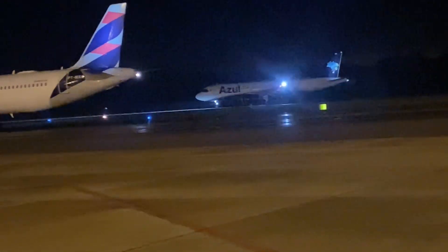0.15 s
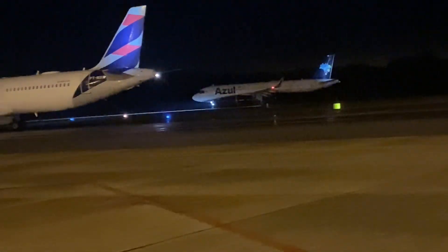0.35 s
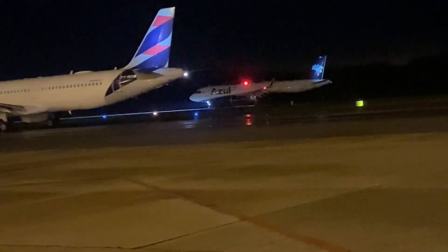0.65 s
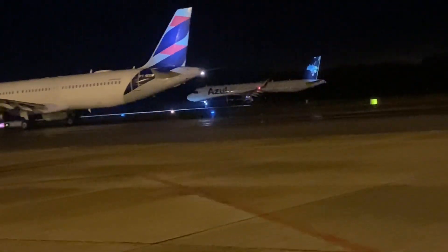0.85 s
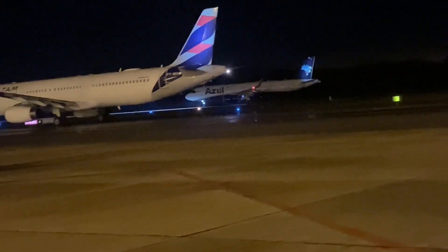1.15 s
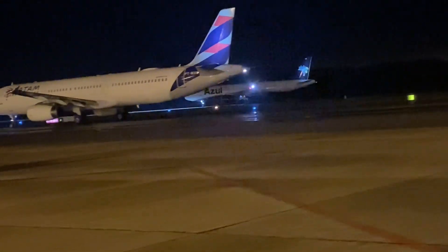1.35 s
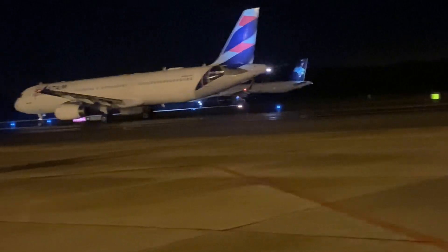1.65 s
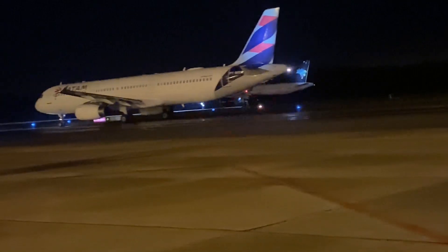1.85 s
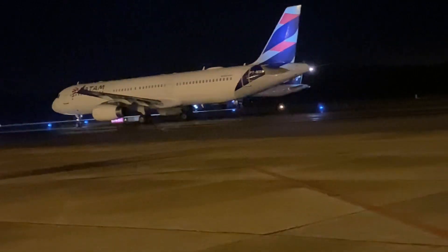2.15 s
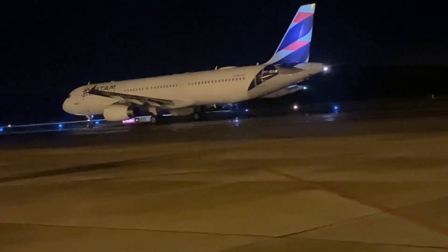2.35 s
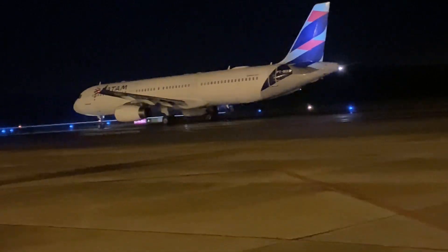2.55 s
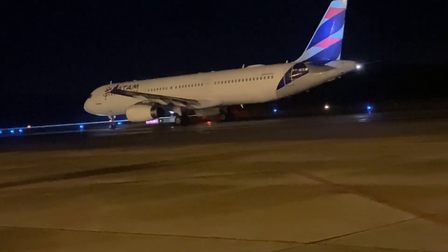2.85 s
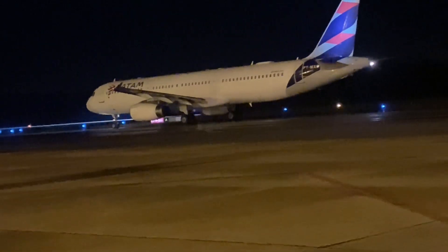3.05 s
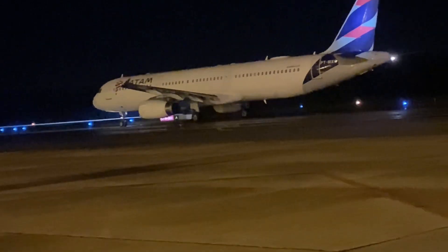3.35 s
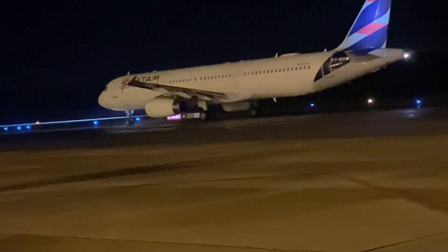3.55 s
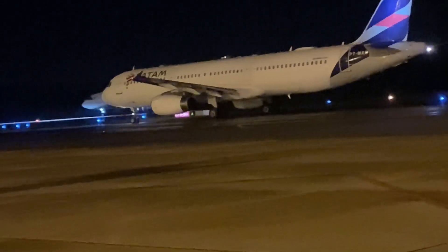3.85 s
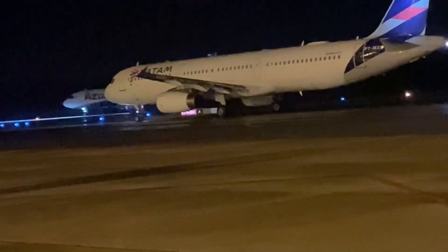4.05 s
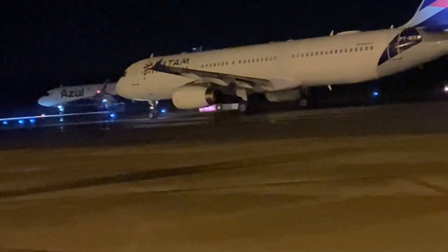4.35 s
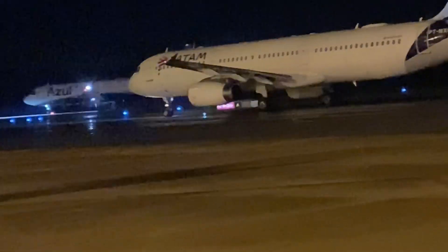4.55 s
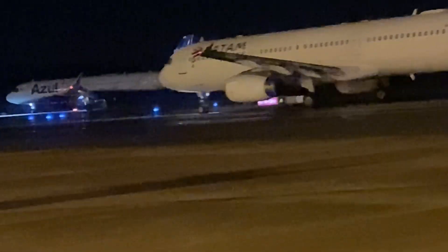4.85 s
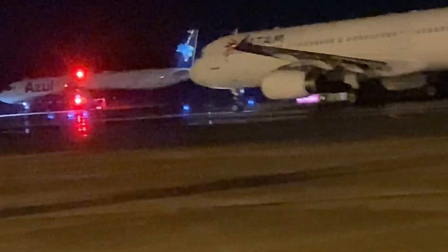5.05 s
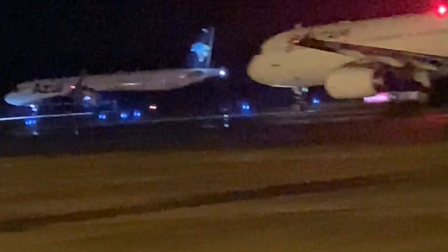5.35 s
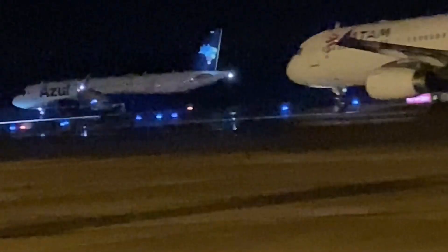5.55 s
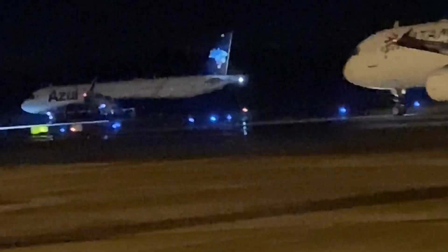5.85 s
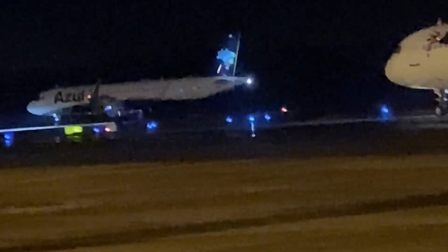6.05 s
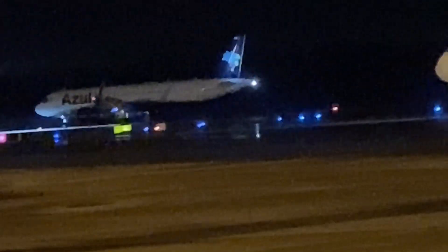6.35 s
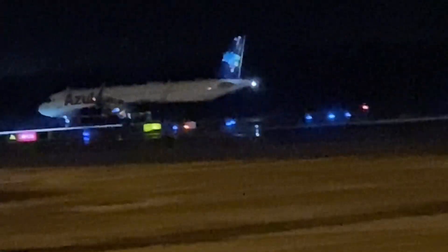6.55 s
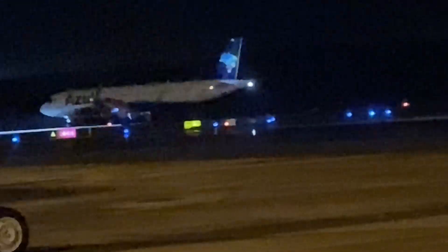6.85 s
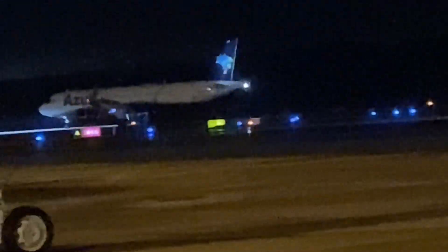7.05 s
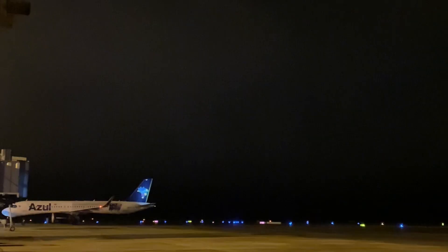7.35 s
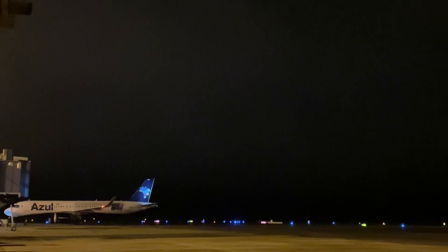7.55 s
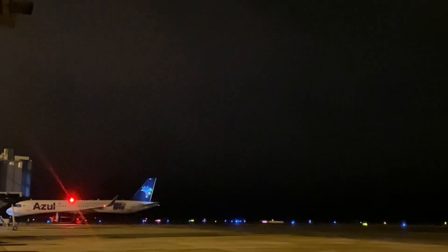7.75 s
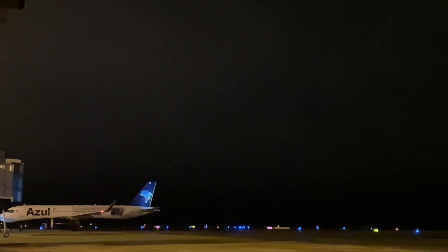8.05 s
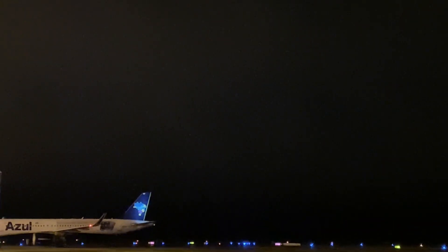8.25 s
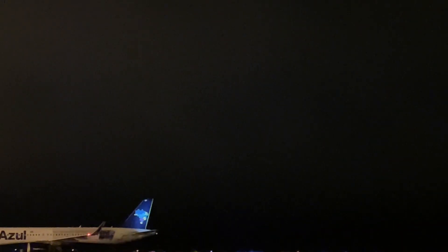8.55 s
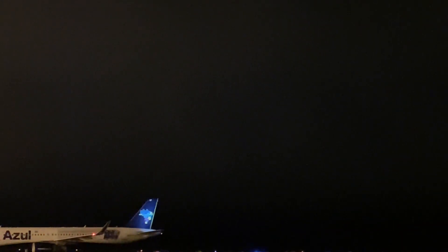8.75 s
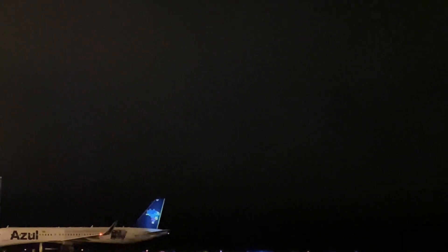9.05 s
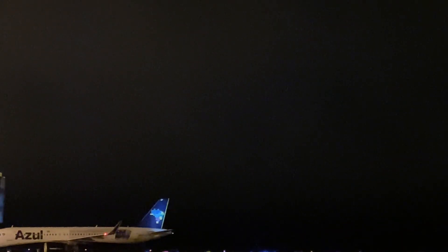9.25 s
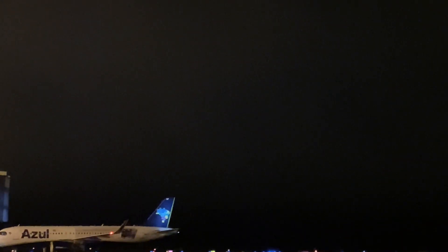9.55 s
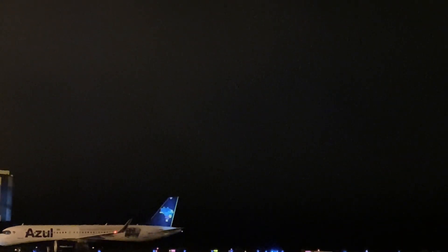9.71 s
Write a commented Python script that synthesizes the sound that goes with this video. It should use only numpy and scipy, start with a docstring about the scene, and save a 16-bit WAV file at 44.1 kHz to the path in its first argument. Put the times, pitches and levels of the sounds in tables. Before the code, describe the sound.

An airliner taxis past on an open airport apron. Deep exhaust roar and a surging, slightly sinking howl run throughout, over a low generator hum. Clean blade whine and fan rush come first, a piercing high tone flares, a fan drone peaks abeam, then raspy intake noise and rough high tones take over. Abruptly it becomes a quieter stand with distant turbine whistles, low rumble and a throbbing diesel idle. Handheld stereo microphone outdoors.

```python
"""An airliner taxis past on an apron, over the firing note of a ground generator: low blade tones and fan rush
at first, a fan drone abeam, then intake rasp and rough tones from ahead; exhaust roar and howl throughout.
At 7.25 s the scene switches abruptly to a quieter stand: a distant turbine whistles and a diesel idles; at 8.28 s
the microphone tilts up. Rotors are tones partly scattered into narrow bands, flows are shaped noise;
two closely spaced microphone ports hear them with differing phase and level."""
import sys
import numpy as np
from scipy import signal
from scipy.fft import rfft, irfft, next_fast_len
from scipy.io import wavfile

SR = 44100
rng = np.random.default_rng(int(sys.argv[2]) if len(sys.argv) > 2 else 0)


def master(y):
    """Save y as 16-bit WAV."""
    cut = np.clip(np.atleast_2d(y).T, -1, 1)
    pcm = np.round(cut * 32767)  # scale
    wavfile.write(sys.argv[1], SR, pcm.astype(np.int16))


N = 435692
TIME = np.arange(N) / SR   # s
SIZE = next_fast_len(N, real=True)
BINS = np.maximum(np.fft.rfftfreq(SIZE, 1 / SR), 1)   # Hz
SWITCH_S = 7.254   # from the passing jet to the quiet stand


def from_db(db):
    """Amplitude factor of a level in dB."""
    return 10 ** (np.asarray(db) / 20)


def rms_one(x):
    """Scale to an rms of 1."""
    return x / np.sqrt(np.mean(np.abs(x) ** 2) + 1e-20)


def in_time(rows):
    """Each column of a curve, sample by sample."""
    time_s, *columns = np.transpose(rows)
    return [np.interp(TIME, time_s, column) for column in columns]


def over_hz(points):
    """A table joined by straight lines on a log-frequency axis."""
    hz, value = np.transpose(points)
    return np.interp(np.log(BINS), np.log(hz), value)


def drift(rate_hz):
    """Smooth random wandering of spread 1: twice low-passed noise, drawn at every 40th sample."""
    step = 40
    pole = np.exp(-2 * np.pi * step * rate_hz / SR)
    settling = 2000   # steps
    noise = rng.standard_normal(N // step + settling + 2)
    slow = signal.lfilter([1], [1, -2 * pole, pole * pole], noise)[settling:]
    return np.interp(np.arange(N) / step, np.arange(len(slow)), rms_one(slow))


def beat(period_s, crest_s):
    """A slow regular swing between -1 and 1."""
    return np.cos(2 * np.pi * (TIME - crest_s) / period_s)


def turning(mid_s, turn_s):
    """A smooth turn from 0 to 1."""
    return .5 + .5 * np.tanh((TIME - mid_s) / (2 * turn_s))


def lobe(at_s, width_s):
    """A beam of sound sweeps over the listener: 1 at its centre, one half at width_s to either side."""
    return 1 / (1 + ((TIME - at_s) / width_s) ** 2)


# likeness of the noise in the two channels, nearly identical in a few narrow bands: pitch_hz, likeness (1 =
# identical)
CHANNEL_LIKENESS = [(100, .999), (300, .993), (550, .985), (800, .88), (1800, .99), (2500, .86), (3300, .995),
                    (4400, .91), (5000, .93), (5900, .75), (6500, .8), (7000, .995), (7600, .995), (8200, .85),
                    (9000, .8), (10500, .9), (15000, .72)]


def turbulence(gain, diffuse=0):
    """Stereo noise of rms 1 with a gain per frequency, less alike at the ports when it comes from all round."""
    alike = over_hz(CHANNEL_LIKENESS) * (1 - diffuse)
    white = rng.standard_normal((2, 2, len(BINS)))
    spectrum = (white[0] + 1j * white[1]) * gain
    mid, side = spectrum * np.sqrt([1 + alike, 1 - alike])
    return rms_one(irfft([mid + side, mid - side], SIZE)[:, :N])


def flow(spectrum, flutter_db, flutter_rate_hz):
    """Flow noise whose level flutters in the moving air."""
    return turbulence(from_db(over_hz(spectrum))) * from_db(flutter_db * drift(flutter_rate_hz))


def tone(hz, width_hz, scatter):
    """A rotor tone of rms 1; a share of its power is scattered by turbulence into a narrow band."""
    share = np.clip(scatter, 0, 1)
    phase = 2 * np.pi * (np.cumsum(hz * np.ones(N)) / SR + rng.random())
    in_phase = np.sqrt(2 * (1 - share)) + np.sqrt(share) * drift(width_hz)
    quadrature = np.sqrt(share) * drift(width_hz)
    return in_phase * np.cos(phase) + quadrature * np.sin(phase)


def whine(hz, flutter_db, flutter_rate_hz, waver_hz):
    """A turbine tone of rms 1 that flutters in level and wavers in pitch on its way through moving air."""
    wavering = tone(hz + waver_hz * drift(14.2), width_hz=29, scatter=.04)
    return rms_one(from_db(flutter_db * drift(flutter_rate_hz)) * wavering)


def steered(x, radians):
    """The left port leads the right by a phase per frequency."""
    shift = np.exp(.5j * radians)
    return irfft(rfft(x, SIZE) * [shift, 1 / shift], SIZE)[:, :N]


def swinging(x, lead, share):
    """A change of bearing shifts the phase between the ports, from a lead to its reverse as share goes 0-1."""
    turn = over_hz(lead)
    return (1 - share) * steered(x, turn) + share * steered(x, -turn)


# rumble and hiss across the quiet stand: pitch_hz, relative_db_per_hz
STAND_SPECTRUM = [(25, -31), (45, 0.5), (90, -3), (200, -3), (350, -5.5), (550, -10), (900, -13.5),
                  (1400, -20.5), (1900, -23.5), (2350, -22.5), (3000, -29), (4000, -32), (5300, -31),
                  (7200, -37), (8500, -39.5), (11000, -48), (15000, -66)]
# share of that noise scattered on the way, arriving from all round: pitch_hz, share
STAND_DIFFUSE_SHARE = [(1900, 0), (2500, .27), (3800, .38), (5000, .13), (7000, 0)]
STAND_RUMBLE_DB, STAND_HISS_DB = -25.5, -39   # at the switch
STAND_RISE_DB_PER_S = 0.45   # rumble and hiss only
# far turbine and machinery: pitch_hz, width_hz, level_db
STAND_MACHINERY = [(366, 8, -35.5), (400, 7, -40), (472, 6, -38.5), (2260, 40, -57.5), (2670, 20, -58),
                   (2756, 12, -56.5), (4807, 25, -61), (5035, 25, -65), (5510, 35, -61.5), (5868, 15, -66)]
# steady whistles of the far turbine: pitch_hz, level_db
FAR_WHISTLES = [(1196, -45), (1875.5, -44.8)]
# a hum that comes and goes: time_s, level_db
HUM_LEVEL_CURVE = [(7.6, -38), (7.9, -30), (8.5, -39.5), (8.85, -31.5), (9.42, -41), (9.54, -27.5)]
HUM_HZ = 226.6


def stand():
    """Distant turbines: rumble and hiss of scattered noise, steady whistles and a hum that comes and goes."""
    rise_db = STAND_RISE_DB_PER_S * np.maximum(TIME - SWITCH_S, 0)
    colour = from_db(over_hz(STAND_SPECTRUM))
    diffuse = over_hz(STAND_DIFFUSE_SHARE)
    treble = 1 / (1 + (1500 / BINS) ** 4)   # power share that belongs to the hiss
    rumble = from_db(STAND_RUMBLE_DB + rise_db) * turbulence(colour * np.sqrt(1 - treble), diffuse)
    hiss_db = STAND_HISS_DB + rise_db + 0.42 * drift(1.3)
    hiss = from_db(hiss_db) * turbulence(colour * np.sqrt(treble), diffuse)
    machinery = sum(from_db(db) * tone(hz, width_hz, scatter=0.53) for hz, width_hz, db in STAND_MACHINERY)
    whistles = sum(from_db(db) * whine(hz, flutter_db=0.7, flutter_rate_hz=11, waver_hz=0.94)
                   for hz, db in FAR_WHISTLES)
    hum_db, = in_time(HUM_LEVEL_CURVE)
    hum = from_db(hum_db) * tone(HUM_HZ, width_hz=9.5, scatter=0.13)
    return rumble + hiss + machinery + whistles + hum


SIZZLE_HZ = 9039
# level at the switch of each of its two parts, steady rise, and flutter
SIZZLE_DB, SIZZLE_RISE_DB_PER_S, SIZZLE_FLUTTER_DB = -62.5, 0.7, 1.8


def sizzle():
    """The far turbine's highest tone, fluttering on a wide skirt of scattered sound as it grows."""
    rise_db = SIZZLE_RISE_DB_PER_S * np.maximum(TIME - SWITCH_S, 0)
    level_db = SIZZLE_DB + rise_db + SIZZLE_FLUTTER_DB * drift(7)
    core = tone(SIZZLE_HZ, width_hz=50, scatter=0.88)
    skirt = tone(SIZZLE_HZ, width_hz=380, scatter=0.93)
    return from_db(level_db) * (core + skirt)


# idling diesel on the stand: multiple of the cycle rate, relative_db
DIESEL_ORDERS = [(6, -51), (7, -36.5), (8, -33.5), (10, -38.5), (14, -47)]
DIESEL_CYCLE_HZ, DIESEL_DB = 7.0, -2.5
THROB_PERIOD_S, THROB_CREST_S, THROB_DB = 1.7, 7.45, 4


def diesel():
    """Neighbouring orders of an idling engine beat into a throb that slowly swells and sinks."""
    orders = sum(from_db(db) * tone(order * DIESEL_CYCLE_HZ, width_hz=2.3, scatter=0.06)
                 for order, db in DIESEL_ORDERS)
    return from_db(DIESEL_DB + THROB_DB * beat(THROB_PERIOD_S, THROB_CREST_S)) * orders


# firing note of the generator on the apron: time_s, level_db
GENERATOR_LEVEL_CURVE = [(0.0, -30), (1.05, -25.5), (1.3, -41), (1.75, -23.5), (2.0, -23), (2.2, -29),
                         (2.8, -28.5), (3.15, -24), (3.5, -30), (3.8, -26), (4.4, -30.5), (4.95, -25),
                         (5.75, -30.5), (6.1, -24.5), (6.6, -30), (7.25, -27)]
GENERATOR_HZ = 75.1


def generator():
    """The firm firing note of a ground power unit, swelling and fading."""
    level_db, = in_time(GENERATOR_LEVEL_CURVE)
    return from_db(level_db) * tone(GENERATOR_HZ, width_hz=3.2, scatter=0.11)


# the intake swings towards the listener: half-way time and time constant
TURN_MID_S, TURN_S = 4.44, 0.4


def facing():
    """The share of the engine noise that is heard from ahead, 0-1."""
    return turning(TURN_MID_S, TURN_S)


def beamed(spectra):
    """Engine noise whose colour changes as the intake turns towards the listener."""
    hz, abeam_db, ahead_db = np.transpose(spectra)
    abeam = turbulence(from_db(over_hz(np.c_[hz, abeam_db])))
    ahead = turbulence(from_db(over_hz(np.c_[hz, ahead_db])))
    return np.sqrt(1 - facing()) * abeam + np.sqrt(facing()) * ahead


# compressor band from two bearings: pitch_hz, abeam relative_db_per_hz, ahead relative_db_per_hz
COMPRESSOR_SPECTRA = [(3450, -25, -28), (3950, 0, -10), (4670, 3.5, -6), (4960, 5, 4), (5630, 4.5, 1),
                      (5670, 1.5, -7), (6700, 0, 2), (7100, -39, -17)]
# its level, which the engine beams as it turns: time_s, level_db
COMPRESSOR_LEVEL_CURVE = [(0.0, -38.5), (0.7, -39), (1.1, -32), (1.55, -33.5), (2.2, -37.5), (3.0, -38.5),
                          (3.9, -47), (4.55, -36.5), (4.9, -34.5), (5.55, -35), (7.25, -43)]
# hiss from two bearings: pitch_hz, abeam relative_db_per_hz, ahead relative_db_per_hz
HISS_SPECTRA = [(3970, -13, -21), (6100, -7, -6), (6900, 3, 3.5), (8200, 5.5, 4), (9440, 1.5, -4),
                (10200, -.5, -1), (11140, 2.5, -4.5), (13100, -6, -11.5), (15400, -49, -31)]
# level of the hiss: time_s, level_db
HISS_LEVEL_CURVE = [(0.0, -39.5), (0.7, -38.5), (1.4, -34.3), (2.3, -38), (2.75, -33), (3.1, -32),
                    (3.45, -37), (4.0, -36.5), (4.4, -31), (5.0, -33), (7.25, -34)]
# rough tones heard from ahead: centre pitch_hz
CLUSTER_PITCHES = [4900, 5030, 5040, 5170, 5240, 5410, 5500]
CLUSTER_DB = -2.5   # relative to the compressor band, once heard fully from ahead
CLUSTER_FLICKER_DB, CLUSTER_WANDER_HZ = 2, 29.96


def compressor():
    """Beamed compressor noise carrying a cluster of tones that wander and flicker, with hiss above."""
    band_db, = in_time(COMPRESSOR_LEVEL_CURVE)
    hiss_db, = in_time(HISS_LEVEL_CURVE)
    band = from_db(band_db + .5 * drift(20)) * beamed(COMPRESSOR_SPECTRA)
    hiss = from_db(hiss_db + 0.67 * drift(22)) * beamed(HISS_SPECTRA)
    cluster = 0
    for hz in CLUSTER_PITCHES:
        flicker = from_db(CLUSTER_FLICKER_DB * drift(6.5))
        cluster = cluster + flicker * tone(hz + CLUSTER_WANDER_HZ * drift(3), width_hz=32, scatter=0.81)
    return band + hiss + from_db(band_db + CLUSTER_DB) * facing() * rms_one(cluster)


# the jet comes near and leaves: time_s, roar level_db (played by the exhaust), rush level_db
PASS_BY_LEVELS = [(0.0, -19.5, -33.5), (2.2, -19.5, -33), (3.3, -20, -30.5), (5.4, -19, -31.5),
                  (7.25, -22.5, -34)]
# broad rush of the fan: pitch_hz, relative_db_per_hz
RUSH_SPECTRUM = [(700, 3), (1200, -3), (1700, 0.5), (2400, 2), (3000, -0.5), (3500, -3.5), (4400, 0.5),
                 (6000, -5), (9000, -31)]
# scattered fan tones: pitch_hz, width_hz, relative_db
FAN_TONES = [(1054, 10, -50.5), (2100, 40, -46.2), (2130, 16, -49.5), (2320, 14, -52), (2350, 40, -49),
             (2372, 26, -50.5), (2604, 16, -50), (2680, 30, -55), (2724, 9, -48.5), (2774, 10, -54),
             (3444, 7, -58.3), (6130, 14, -61), (10003, 10, -63)]
# loudest as the engine passes, smeared in pitch when heard from ahead
FAN_TONES_DB, FAN_TONES_LOBE_DB, FAN_TONES_SMEAR_HZ = 1, 4, 6.98
FAN_TONES_AT_S, FAN_TONES_WIDTH_S = 4.35, 0.95
# low drone beamed sideways: level outside the beam, and gain at its centre
DRONE_HZ, DRONE_DB, DRONE_LOBE_DB = 527, -31, 6.5
DRONE_LOBE_AT_S, DRONE_LOBE_WIDTH_S = 3.5, 0.85
# rasp of the intake, beamed forwards: pitch_hz, relative_db_per_hz
INTAKE_SPECTRUM = [(700, -4), (1020, 7), (1150, -4), (1750, -0.5), (2300, -33), (2700, -4), (2940, 4),
                   (3200, -4), (3420, 2.5), (3900, -22), (6000, -50)]
INTAKE_PEAK_DB, INTAKE_AT_S, INTAKE_WIDTH_S = -35, 5.94, 1


def fan():
    """The fan's broad rush, with scattered tones and a low drone that peak abeam, then the rasp of the intake."""
    _, rush_db = in_time(PASS_BY_LEVELS)
    rush = from_db(rush_db) * flow(RUSH_SPECTRUM, flutter_db=0.66, flutter_rate_hz=15)

    tones_db = FAN_TONES_DB + FAN_TONES_LOBE_DB * lobe(FAN_TONES_AT_S, FAN_TONES_WIDTH_S)
    smear_hz = FAN_TONES_SMEAR_HZ * facing()
    tones = from_db(tones_db) * sum(from_db(db) * tone(hz + smear_hz * drift(19.6), width_hz, scatter=0.75)
                                    for hz, width_hz, db in FAN_TONES)

    drone_db = DRONE_DB + DRONE_LOBE_DB * lobe(DRONE_LOBE_AT_S, DRONE_LOBE_WIDTH_S)
    drone = from_db(drone_db) * tone(DRONE_HZ, width_hz=10.7, scatter=0.78)

    intake_gain = from_db(INTAKE_PEAK_DB) * lobe(INTAKE_AT_S, INTAKE_WIDTH_S)
    intake = intake_gain * flow(INTAKE_SPECTRUM, flutter_db=1.5, flutter_rate_hz=12)
    return rush + tones + drone + intake


# low blade tones in one broad beam: pitch_hz, level_db at the centre of the beam
LOW_BLADE_TONES = [(2080, -42.7), (2320, -49.5)]
LOW_BLADES_AT_S, LOW_BLADES_WIDTH_S = 1.9, 1.7
# level of the high blade tone: time_s, level_db
BLADE_LEVEL_CURVE = [(0.0, -50), (0.9, -51), (1.15, -43), (1.45, -36), (1.8, -38.5), (2.25, -47),
                     (3.2, -42.5), (3.85, -50), (4.6, -41), (5.3, -47), (7.25, -58)]
BLADE_HZ = 5002
# narrow beams of a neighbouring tone sweep past: centre time_s
FLASH_TIMES = [1.25, 2.2]
FLASH_HZ, FLASH_WIDTH_S, FLASH_DB = 4495, .22, -47.5   # level of one beam at its centre


def blades():
    """Clean blade tones beamed sideways: a lasting low pair, a piercing high one and a neighbour that flashes up."""
    low = sum(from_db(db) * whine(hz, flutter_db=1.8, flutter_rate_hz=20, waver_hz=1.14)
              for hz, db in LOW_BLADE_TONES)
    high_db, = in_time(BLADE_LEVEL_CURVE)
    high = from_db(high_db) * whine(BLADE_HZ, flutter_db=1.4, flutter_rate_hz=17, waver_hz=1)
    flashes = sum(lobe(at_s, FLASH_WIDTH_S) for at_s in FLASH_TIMES)
    neighbour = from_db(FLASH_DB) * flashes * whine(FLASH_HZ, flutter_db=2, flutter_rate_hz=10, waver_hz=1)
    return lobe(LOW_BLADES_AT_S, LOW_BLADES_WIDTH_S) * low + high + neighbour


# exhaust roar of the passing jet: pitch_hz, relative_db_per_hz
ROAR_SPECTRUM = [(25, -42), (35, -38), (50, -10), (90, -5.5), (125, -3), (160, -3.5), (250, -6.5),
                 (390, -2.5), (490, -7), (620, -15), (850, -16.5), (1150, -29.5), (1600, -31), (4000, -67)]
# broad moan of the nozzle under the howl: time_s, level_db
MOAN_LEVEL_CURVE = [(0.0, -27.5), (3.3, -29), (4.25, -35), (4.75, -22), (5.25, -21), (5.52, -16.5),
                    (5.62, -20), (6.25, -26), (6.56, -18), (6.8, -29)]
MOAN_HZ, MOAN_WIDTH_HZ = 404, 52
# surging howl: time_s, level_db
HOWL_LEVEL_CURVE = [(0.0, -32), (0.45, -21.5), (0.8, -27.5), (1.15, -21), (1.65, -38), (2.2, -30),
                    (2.6, -36), (2.95, -24.5), (3.2, -28.5), (3.55, -22), (4.2, -45), (4.42, -24.5),
                    (4.8, -28), (5.2, -15.5), (5.42, -13.5), (5.65, -28), (5.8, -19), (6.15, -18.5),
                    (6.23, -30), (6.33, -19.5), (6.72, -20), (6.95, -25.5), (7.25, -16.5)]
# the howl sinks in pitch until it settles
HOWL_START_HZ, HOWL_SAG_HZ_PER_S, HOWL_SETTLED_HZ = 463.7, 4.5, 441.8


def exhaust():
    """Low jet roar, with a nozzle moan and a surging howl that sinks in pitch as the aircraft passes."""
    roar_db, _ = in_time(PASS_BY_LEVELS)
    roar = from_db(roar_db) * flow(ROAR_SPECTRUM, flutter_db=0.96, flutter_rate_hz=8.4)

    moan_db, = in_time(MOAN_LEVEL_CURVE)
    resonance = 1 / (1 + ((BINS - MOAN_HZ) / (MOAN_WIDTH_HZ / 2)) ** 2)
    moan = from_db(moan_db) * turbulence(resonance)

    howl_db, = in_time(HOWL_LEVEL_CURVE)
    sinking_hz = np.maximum(HOWL_START_HZ - HOWL_SAG_HZ_PER_S * TIME, HOWL_SETTLED_HZ)
    howl = from_db(howl_db) * tone(sinking_hz + 2.47 * drift(8.85), width_hz=22, scatter=0.24)
    return roar + moan + howl


# left port's lead as the jet comes, reversed as it leaves: pitch_hz, lead_radians
JET_LEAD = [(150, 0), (400, .06), (750, .17), (1200, -.08), (1900, .04), (2500, .18), (3200, .04),
            (4400, .33), (5100, 0)]
# left port's lead for the far turbine, off to the left: pitch_hz, lead_radians
FAR_LEAD = [(400, 0), (1200, .45), (1850, .15), (2400, 1.15), (3300, 1.8), (3700, .95), (5000, .05)]
# the microphone tilts up; left port's extra lead before, reversed after: pitch_hz, lead_radians
MICROPHONE_TILT_LEAD = [(200, 0), (700, .25), (1700, .05), (3300, .5), (4200, 0)]
TILT_MID_S, TILT_S = 8.28, .05
DIP_S, DIP_DB, FADE_S = .010, -10.5, .002


def scene():
    """The passing jet gives way to the quiet stand, which starts with a brief dip in level."""
    before = np.clip((SWITCH_S - TIME) / FADE_S + .5, 0, 1)
    dip = np.clip((TIME - SWITCH_S - DIP_S) / FADE_S + .5, from_db(DIP_DB), 1)
    after = dip * (TIME > SWITCH_S)
    far = steered(stand(), over_hz(FAR_LEAD))
    far = swinging(far, MICROPHONE_TILT_LEAD, turning(TILT_MID_S, TILT_S))
    jet = swinging(compressor() + fan() + blades() + exhaust(), JET_LEAD, facing())
    return before * (jet + generator()) + after * (far + sizzle() + diesel())


# phase by which the left microphone port leads: pitch_hz, lead_radians
PORT_LEAD = [(150, 0), (400, .15), (750, .45), (1200, -.35), (1900, 0), (2500, .6), (3200, 0), (3700, .05),
             (4400, .47), (5100, .22), (6000, 1.6), (6900, 3), (7650, 3.3), (10500, 6.3), (13700, 9.4),
             (16000, 12.6)]
# left port minus right port: pitch_hz, difference_db
PORT_LEVEL_DIFFERENCE = [(70, 0), (160, -.8), (350, -1), (600, .3), (900, 2.6), (1600, 0), (3500, 0),
                         (4400, -.8), (5500, 0)]
CUTOFF_HZ = 15750


def record(dry):
    """The two microphone ports differ in phase and level; a steep low-pass cuts the top."""
    left = from_db(over_hz(PORT_LEVEL_DIFFERENCE) / 2) * np.exp(.5j * over_hz(PORT_LEAD))
    ports = irfft(rfft(dry, SIZE) * [left, 1 / left], SIZE)[:, :N]
    low_pass = signal.ellip(12, .1, 90, CUTOFF_HZ, fs=SR, output="sos")
    return signal.sosfilt(low_pass, ports)


dry = scene()
out = record(dry)
master(out)
```